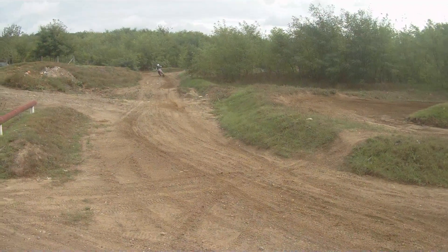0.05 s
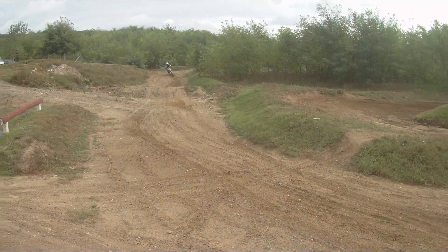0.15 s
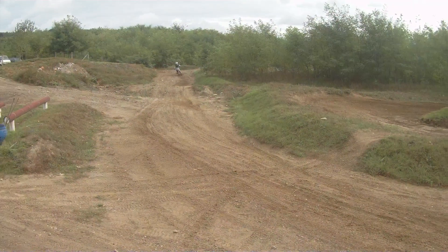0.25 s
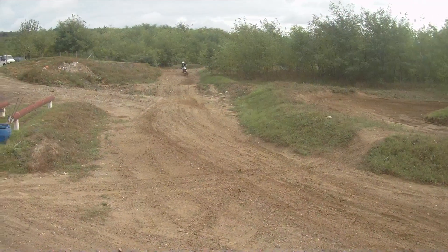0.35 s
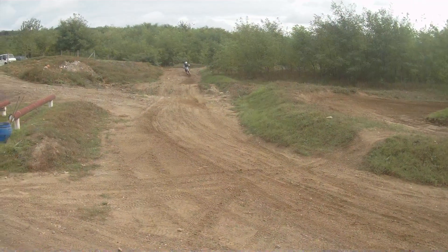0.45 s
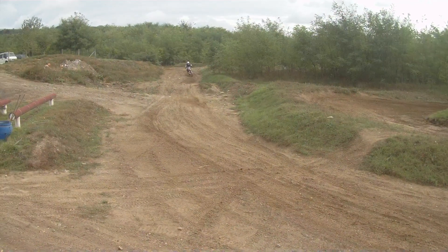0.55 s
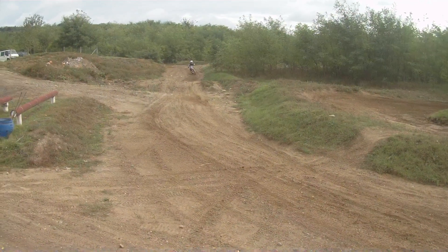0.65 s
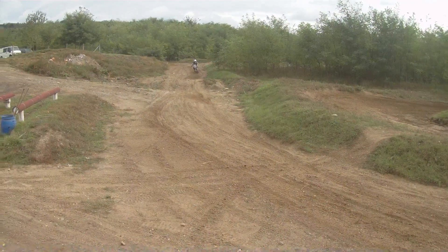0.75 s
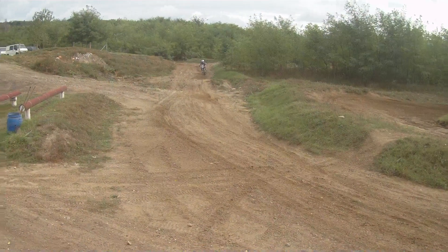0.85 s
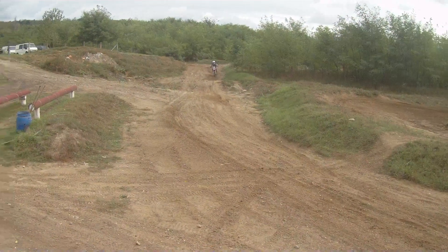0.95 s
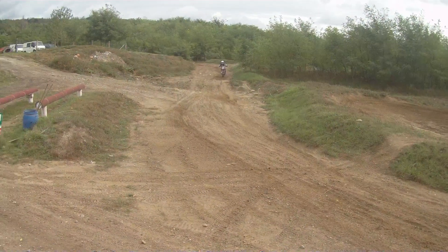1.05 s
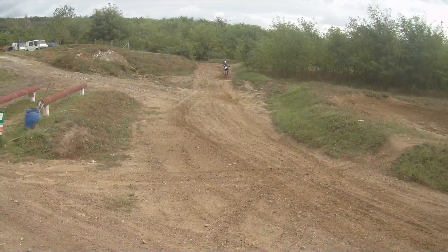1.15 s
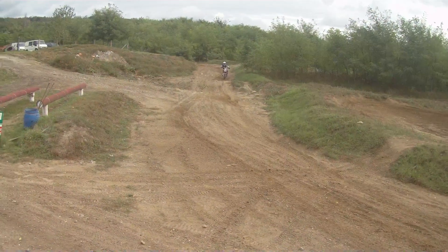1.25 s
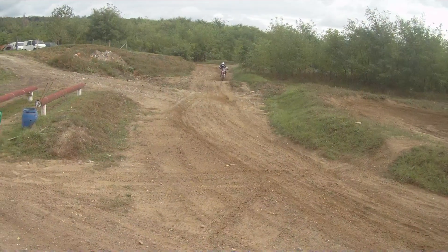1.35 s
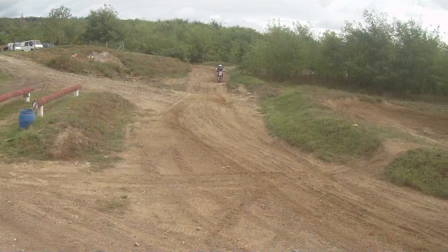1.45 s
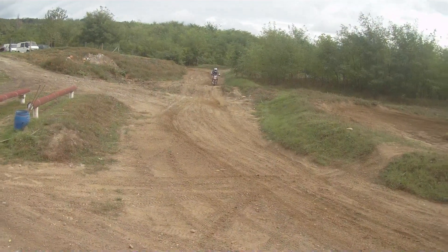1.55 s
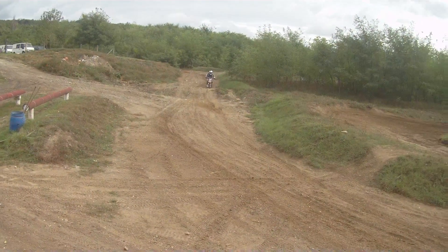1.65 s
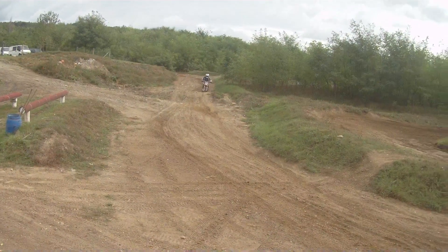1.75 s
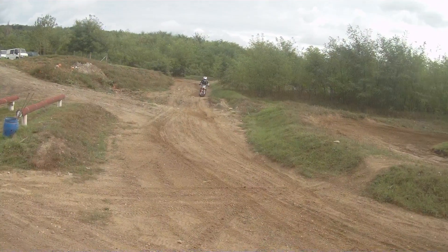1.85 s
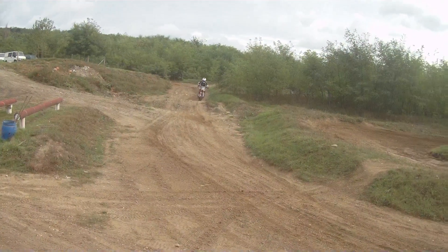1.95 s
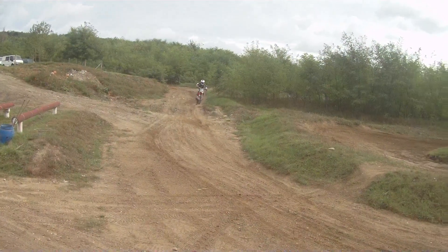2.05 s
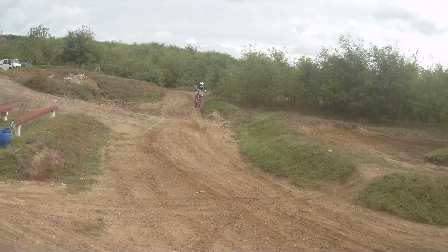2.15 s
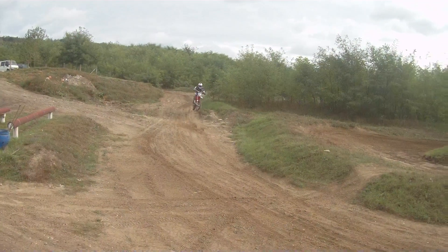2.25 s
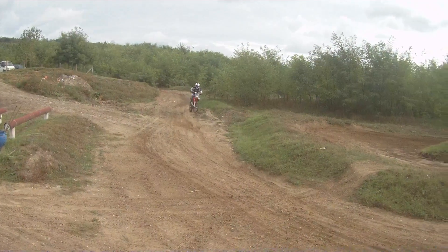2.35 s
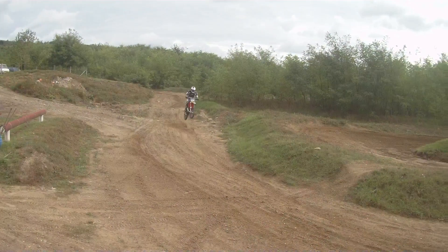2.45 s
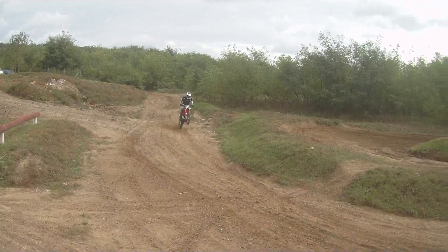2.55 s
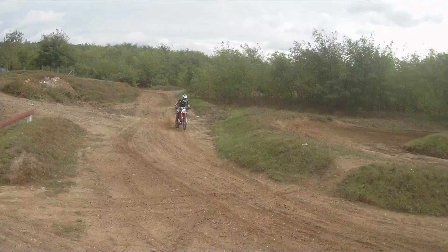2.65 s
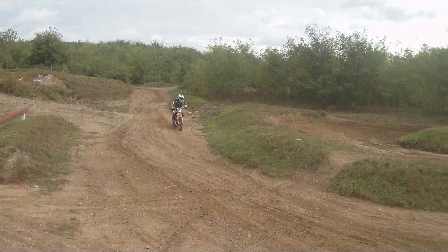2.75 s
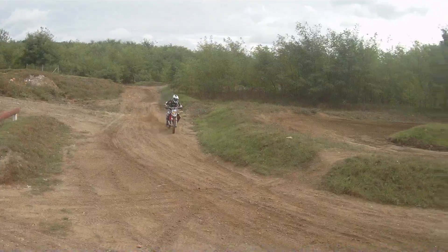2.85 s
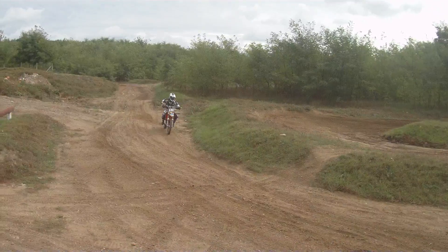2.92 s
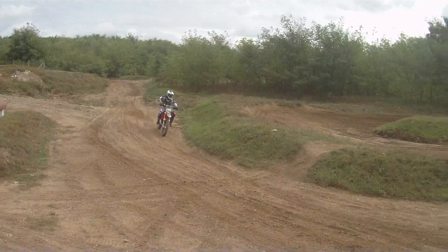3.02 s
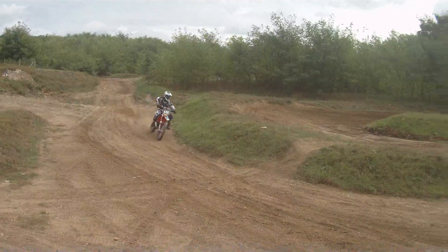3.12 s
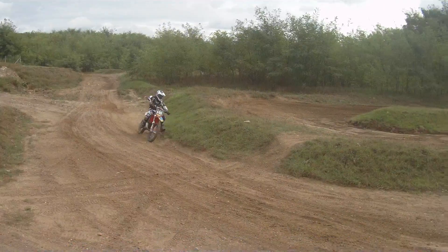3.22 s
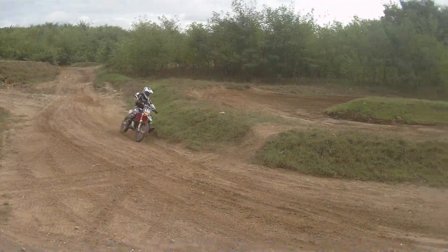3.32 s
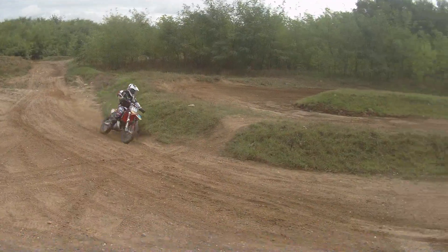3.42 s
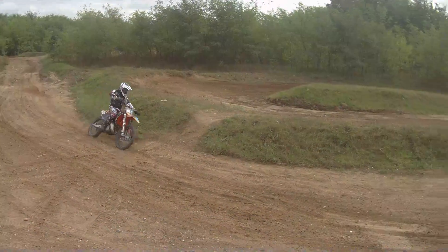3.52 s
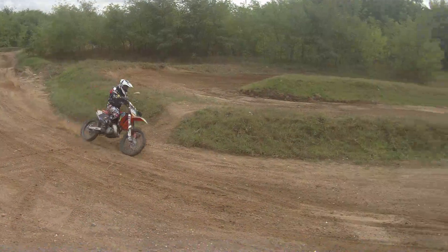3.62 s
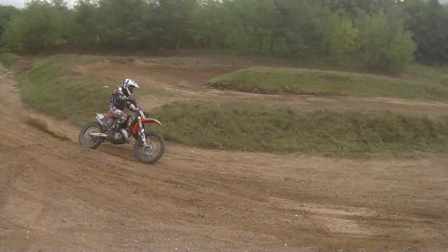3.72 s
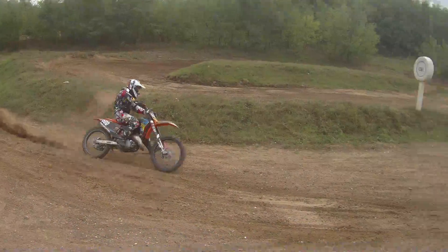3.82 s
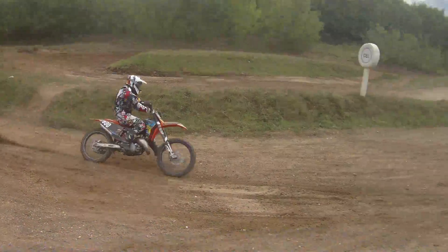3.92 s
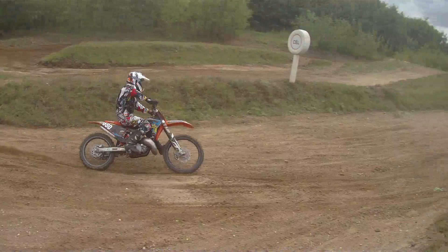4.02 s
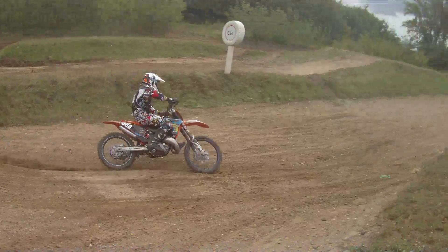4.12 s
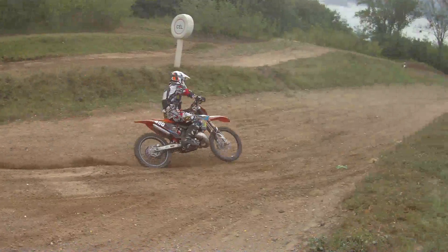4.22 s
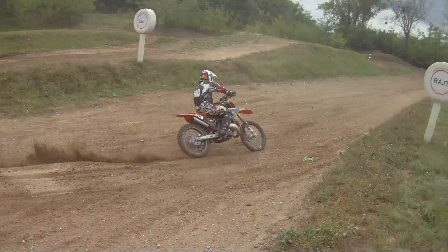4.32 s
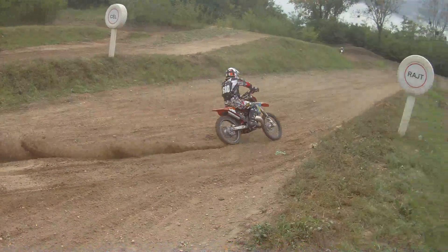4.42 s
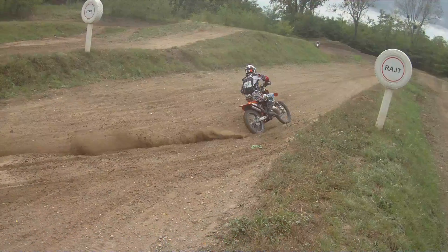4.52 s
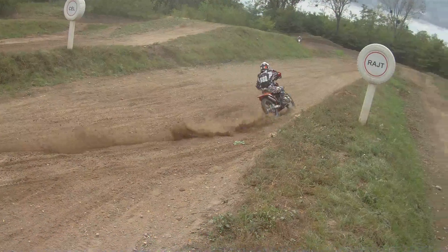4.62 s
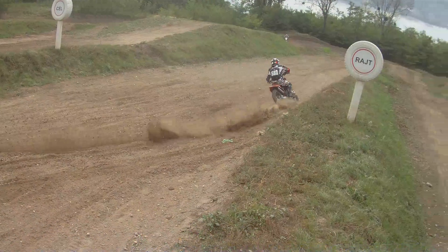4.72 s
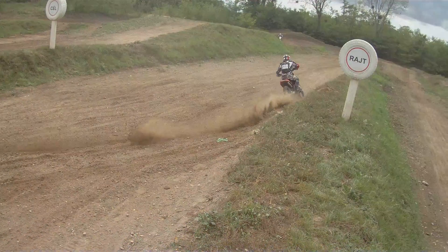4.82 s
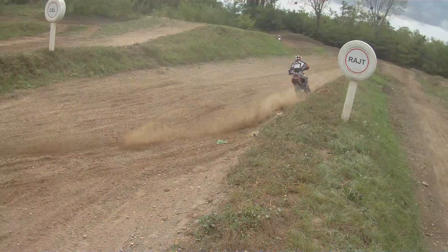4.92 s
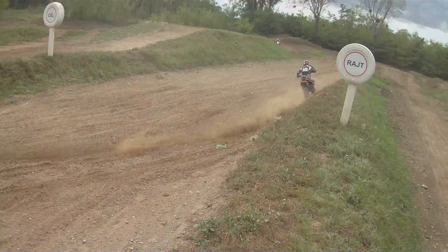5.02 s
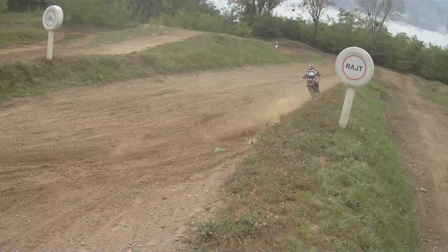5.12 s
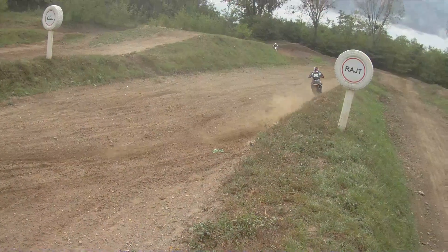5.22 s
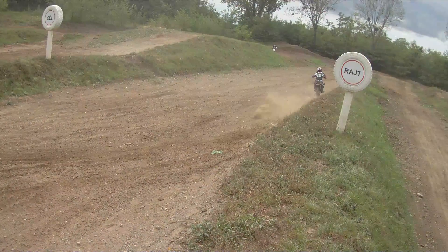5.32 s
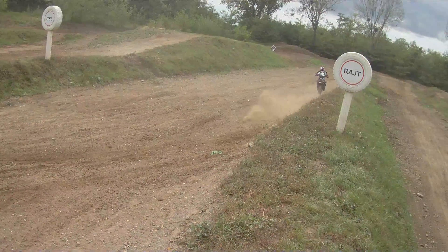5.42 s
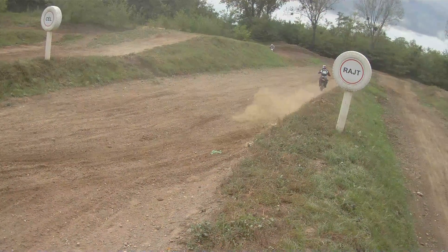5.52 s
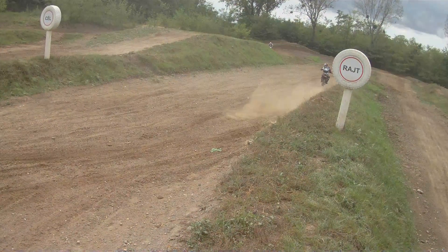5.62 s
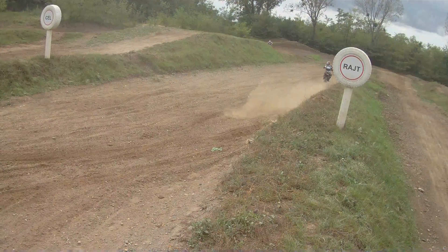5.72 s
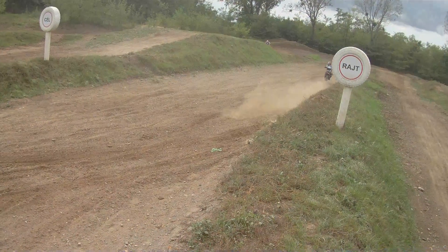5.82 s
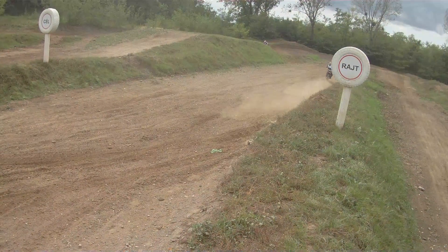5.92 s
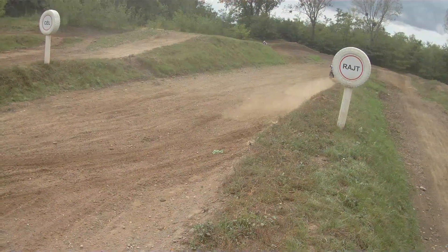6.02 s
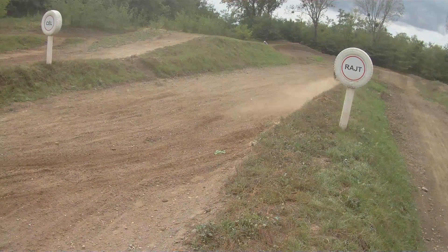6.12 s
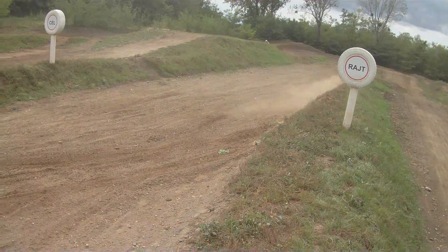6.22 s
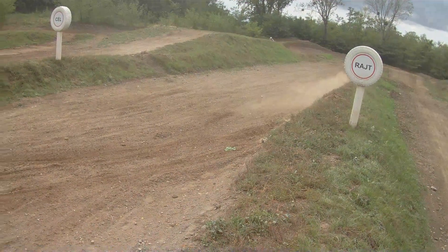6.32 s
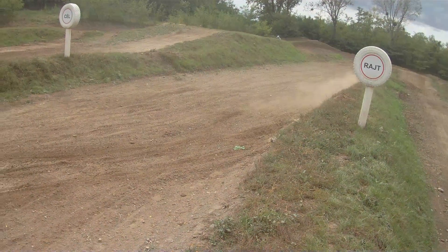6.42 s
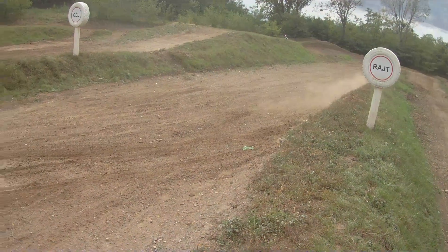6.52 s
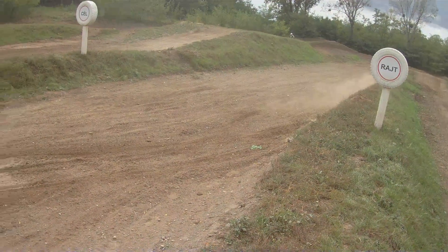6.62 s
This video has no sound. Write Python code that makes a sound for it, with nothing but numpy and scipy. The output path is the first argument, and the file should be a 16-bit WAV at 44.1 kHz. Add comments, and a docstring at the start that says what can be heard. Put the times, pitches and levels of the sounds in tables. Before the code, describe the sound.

Soft wind puffs and a dull far engine drone come first, with a two-stroke dirt bike stuttering and blipping in the distance. After a short coasting gap it opens up, sweeps by within a few metres, loud and raspy with wheelspin flares, then recedes in one long pull. The cheap microphone clips and adds glassy fizz; open air, slight scatter from banks and trees.

```python
"""A far four-stroke drones under light wind on the microphone, then a two-stroke motocross bike blips closer.
It rounds the bend under 9 m away at full throttle and climbs off, while another two-stroke whines far off.
Each engine is a train of firing pulses through pipe colours; the near one adds port cracks and gas noise.
Wind and the din of the track are coloured noise. The small camera overloads on the close pass and stores
12000 held samples a second, which adds a glassy fizz."""
import sys
import numpy as np
from scipy import signal
from scipy.fft import rfft, irfft, next_fast_len
from scipy.io import wavfile
from scipy.ndimage import map_coordinates

SR = 44100
rng = np.random.default_rng(int(sys.argv[2]) if len(sys.argv) > 2 else 0)


def master(y):
    """Save y as 16-bit WAV."""
    cut = np.clip(np.atleast_2d(y).T, -1, 1)
    pcm = np.round(cut * 32767)  # scale
    wavfile.write(sys.argv[1], SR, pcm.astype(np.int16))


N = 293706
TIME = np.arange(N) / SR  # s

# Where the near bike points. Each row: time in seconds, heading
# (0 = far off and head-on, 1 = close and side-on, 2 = tailpipe toward the camera).
HEADING = [(2.8, 0.036), (3.65, 0.97), (4.6, 1.106), (5.1, 1.48), (5.5, 1.63)]
# How far it is from the microphone. Each row: time in seconds, distance in metres.
DISTANCE = [(0, 74), (2, 31.2), (3, 29.7), (3.5, 17.5), (3.75, 8.7), (4.2, 8.8), (4.6, 8.34), (5.1, 12.5),
            (5.5, 18.1), (6.25, 30.4), (6.66, 60)]
NEAR_M, CRUISE_HZ = 6.82, 155.3  # voice levels hold at this distance and firing rate

# The rider's hand, one row per twist of the throttle. Each row: opening in seconds, shutting in seconds,
# firings a second pulled toward at first, the same at last, attack in seconds (the same small number is
# the relative thump in dB), relative pipe bark in dB, relative rasp in dB, a column left unused,
# swell from start to end in dB (each voice takes its own share of it).
THROTTLE = [(0.164, .23, 94, 106, 0.026, -9, -5, -8, -13),
            (0.332, .62, 109, 111.5, 0.024, -5.5, -4.5, -6.5, 1),
            (.68, 0.778, 104, 173, 0.0092, -4, 0.5, -3, -6),
            (.851, 1.53, 104, 139, 0.043, -1, -3.5, -5.5, -2),
            (1.943, 2.102, 180, 114, 0.019, -2, -3, -3, 1),
            (2.536, 2.721, 110, 188, 0.00094, 0, 1.5, -1.5, 0.5),
            (2.828, 3.025, 95, 114, 0.013, 0, 1, -1.5, -4),
            (3.515, 3.983, 149.4, 168.2, 0.0022, -2.5, -2.5, -6, 2.5),
            (3.986, 4.043, 139, 157, 0.0054, -4, -16, -14, 1.5),
            (4.047, 4.256, 132, 123, 0.0034, 1, 3, -2.5, -1.5),
            (4.249, 4.633, 137.6, 162.3, 0.017, 6, 6, 2.5, -2),
            (4.745, 4.795, 111, 111, 0.055, -1, -14, -18, 0.5),
            (4.8, 5.18, 119.2, 142, 0.0021, -1, 5, 0, 1), (5.179, 5.301, 136, 148.6, .012, -3, 3.5, -5, -1),
            (5.3, 6.411, 127.6, 168, .012, -1, -2.5, -3.5, 2),
            (6.41, 6.58, 151, 138, 0.013, -3, -3.5, -4, -0.5),
            (6.586, 6.648, 140, 150, .001, -3, 1, -2, -3)]
# The rear wheel loses grip and the revs flare. Each row: centre in seconds, extra firings a second,
# half length in seconds.
WHEELSPINS = [(0.489, 7, .06), (0.927, 10, 0.037), (1.272, 17.8, .034), (1.488, 9.9, 0.051),
              (3.651, 38, .068), (3.962, 9.7, .038), (4.284, 38.5, 0.086), (4.513, 10.15, .035),
              (4.953, 11.4, 0.035), (5.112, 32.7, 0.067), (5.459, 15, .05), (5.588, 23.6, 0.028),
              (5.821, 11.2, .2), (6.286, 7.7, 0.035), (6.424, 20.3, 0.035)]
IDLE_HZ = 100  # firings a second pulled toward with the throttle shut
FLYWHEEL_S = 0.035  # lag of the revs behind the throttle
RELEASE_S = 0.011  # the exhaust dies down when the throttle shuts
# Ripples in the climb rock the revs.
RIPPLES_FROM_S, RIPPLES_GROW_S, RIPPLE_CREST_S = 5.3, 0.3, 5.877
RIPPLES_PER_S, RIPPLE_SWING_HZ = 9.35, 2.6

# Low and middle exhaust colours as the bike turns. Each row: frequency in Hz, relative level head-on in dB,
# side-on in dB, from the rear in dB.
THUMP_COLOUR = [(61, -75.5, -52, -47), (99, -21, -20, -29), (131.2, 0.5, 3, -1), (160, -7.5, 1.5, -8.5),
                (224, 7, 5, -14), (266, 4, 9, 7.5), (305.4, -5, 1, 0), (348, -13, -3, -2.5),
                (380.7, -44, -6, -2.5), (518, -68, -56, -44), (1520, -96, -91, -103)]
BARK_COLOUR = [(314, -49.5, -50.5, -43.5), (357, -12.5, -13, 1.5), (436.2, 1, -1.5, -3.5),
               (458, 2, -2.5, 4), (582, -5, -5, 1), (623, 0.5, 2.5, 4), (684, 6, 4.5, 5),
               (758, -9, -1, -24), (830.8, -13.5, -14, -20.5), (907.5, -16.5, -11, -17.5),
               (1006.7, -23, -33, -68), (1350, -64, -49.5, -58.5), (3000, -97, -86.5, -91)]
# Rasp colours from the three sides. Each row: frequency in Hz, relative level in dB.
RASP_FRONT = [(650, -42), (1100, -16.5), (1330, -9.5), (1960, -4.5), (2250, 0), (2820, -16.5), (3130, -23),
              (3390, -13), (3660, -9), (4300, -35.5), (4780, -20.5), (5420, -26.5), (5900, -39),
              (7670, -79), (13000, -120)]
RASP_SIDE = [(650, -16), (1100, -11), (1570, 1.5), (2300, 9), (2490, 2.5), (2780, -1), (3180, -9.5),
             (3410, 1), (3630, 2), (3920, -5), (4300, -18.5), (4740, -9.5), (5240, -8.5), (5420, -11),
             (5900, -23), (7670, -51), (13000, -120)]
RASP_REAR = [(650, -7), (1100, -40), (1250, -6), (1380, -15), (1570, -2.5), (1700, -11), (2240, 6.5),
             (2670, -8.5), (3130, -20), (3410, -10.5), (3630, -5.5), (4360, -28.5), (4780, -19),
             (5350, -14), (5900, -50.5), (7670, -133), (13000, -120)]
# Cracks within one turn of the crank, as the ports open and close. Each row: share of a turn,
# relative level in dB.
PORTS = [(0, 3), (0.131, -5.5), (0.308, 1), (.52, -2)]
# How each exhaust voice carries. Each holds: level head-on in dB, side-on in dB, from the rear in dB,
# floor with the throttle shut in dB, dB per octave of revs, share of the swell.
THUMP_LAW = (-12, -12.5, -2.5, -16.5, 3, 0.5)
BARK_LAW = (-16, -11.5, 3.5, -20, 6.5, 1.5)
RASP_LAW = (-21, -15.5, -18.5, -9, 15.5, 1.5)

# Uneven burning (0-1): under load, weight of a shut throttle, seconds it takes to clear, extra at idling speed.
UNEVEN_LOADED, UNEVEN_SHUT, CLEARS_S, UNEVEN_IDLING = 0.07, 0.7, 0.055, 0.16
# Power share of gas noise in the rasp: close by, per doubling of distance, per unit of uneven burning.
GAS_NEAR, GAS_PER_DOUBLING, GAS_PER_UNEVEN = 0.049, 0.13, 0.75
SCATTER_NEAR_DB, SCATTER_DB_PER_DOUBLING = -23, 4.5  # sound scattered by banks and trees

# Far engines, before their waver. Each row: time in seconds, firings a second, level in dB.
FOUR_STROKE_RUN = [(0, 42.4, -45), (.3, 48, -37.5), (.7, 30.4, -38), (1.15, 50.5, -37), (1.5, 47.6, -36.5),
                   (2.1, 47, -39.5), (2.9, 50.6, -35.5), (3.45, 55, -37.5), (5.1, 57.3, -36.5),
                   (6.66, 59.5, -36.5)]
TWO_STROKE_RUN = [(0, 133, -69), (.25, 154, -40), (.5, 161, -45), (.7, 136, -42), (.9, 227, -47),
                  (1.8, 192, -50.5), (2, 280, -50), (2.2, 226, -44), (2.8, 238, -37), (3.45, 196, -56),
                  (5, 238, -49), (6.66, 170, -71)]
# Their pipes as heard across the track. Each row: frequency in Hz, relative level in dB.
FOUR_STROKE_PIPE = [(30, -37), (50, -2.5), (75, -11), (100, 0.5), (150, -12), (195, 2), (250, -1),
                    (305, -6), (370, -25.5), (480, -19), (650, -20.5), (1000, -40), (2000, -63)]
TWO_STROKE_PIPE = [(100, -30), (155, 16.5), (200, -7), (270, 1), (340, -17), (420, -15), (620, 5.5),
                   (720, -8), (850, -5.5), (1050, -25.5), (2200, -17), (4000, -37.5), (6000, -56)]

# Puffs of wind on the microphone, before their waver. Each row: time in seconds, peak level in dB.
GUSTS = [(0, -45), (.35, -39), (.85, -38), (1.3, -40), (1.62, -48), (1.83, -30.5), (2.65, -39), (2.86, -31),
         (3.28, -43), (4.34, -45), (4.69, -44)]
GUST_DB_PER_S, BREEZE_DB = 109, -64  # rise and fall of a puff; floor between puffs, before its waver
# Colour of the wind at the microphone. Each row: frequency in Hz, relative level in dB.
BUFFET_COLOUR = [(8, -3), (22, 9), (45, -2), (80, 0.5), (160, -21), (400, -57), (2000, -87)]
# Colour of the far track din. Each row: frequency in Hz, relative level in dB.
DIN_COLOUR = [(35, -43), (60, 8.5), (107, 1), (145, -4), (183, -5), (248, -8.5), (358, -2), (687, -16.5),
              (1070, -30), (1220, -25), (2260, -11.5), (2840, -29), (3650, -20.5), (4180, -33.5),
              (5900, -41), (7670, -74), (13000, -120)]

# Hollows of the microphone port. Each row: centre in Hz, width in Hz, depth from 0 to 1.
PORT_HOLLOWS = [(1077, 125, 0.65), (2728, 150, 0.68), (4310, 170, 0.33)]
STORE_HZ, TOP_HZ = 12000, 15400  # samples stored a second; top of the output band
LEFT_OFFSET = 0.027  # constant offset on the left channel before overload, 1 = full scale


def near_bike():
    """Each firing thumps, rings the expansion pipe and lets out cracks with a jet of gas."""
    rate = revs()
    thump_twists, bark_twists, rasp_twists = np.transpose(THROTTLE)[4:7]
    thump_db = loudness(THUMP_LAW, thump_twists, rate)
    bark_db = loudness(BARK_LAW, bark_twists, rate)
    rasp_db = loudness(RASP_LAW, rasp_twists, rate)
    uneven, gas, scatter_db = burning(rate)

    # nearly exact firings under load; they stumble as burning grows uneven
    at = firings(rate * (1 + 0.001 * wobble(40)), scatter=0.0007 + 0.016 * uneven)
    blows = pulses(at, spread_db=0.57 + 1.3 * uneven)
    thump = amp(thump_db) * aimed(blows, outlines_by_heading(THUMP_COLOUR))
    bark_outlines = outlines_by_heading(BARK_COLOUR)
    bark = amp(bark_db) * aimed(bounced(blows, share=0.44, lag=0.002898, sway=0.25), bark_outlines)

    # the cracks vary more from firing to firing than the low thump does
    cracks = port_cracks(at, spread_db=1.0 + 1.6 * uneven, flutter=0.0021, drift=0.041)
    jet_decay = np.exp(-TIME[:SR // 50] * 480)
    jet_strength = steady(signal.fftconvolve(cracks, jet_decay)[:N])
    jet = (jet_strength + 1.8) * rng.standard_normal(N)
    edge = np.sqrt(1 - gas) * steady(cracks) + np.sqrt(gas) * steady(jet)
    rasp = amp(rasp_db) * aimed(edge, [RASP_FRONT, RASP_SIDE, RASP_REAR])
    gas_rush = amp(bark_db) * uneven * aimed(jet, bark_outlines)

    direct = thump + bark + gas_rush + rasp
    return direct + scattered(direct * amp(scatter_db), t60=0.28)


def revs():
    """Firings a second: the flywheel follows the throttle, wheelspin flares it and ripples rock it."""
    first, last = np.transpose(THROTTLE)[2:4]
    pull = lagged(throttled(first, last, IDLE_HZ), FLYWHEEL_S)
    flares = sum(extra * np.exp(-((TIME - s) / half) ** 2) for s, extra, half in WHEELSPINS)
    rippled = np.clip((TIME - RIPPLES_FROM_S) / RIPPLES_GROW_S, 0, 1)
    rocking = np.cos(2 * np.pi * RIPPLES_PER_S * (TIME - RIPPLE_CREST_S))
    return pull + flares + RIPPLE_SWING_HZ * rippled * rocking


def throttled(first, last, shut):
    """A control that runs from first to last during each twist of the throttle and rests at shut between."""
    control = np.full(N, float(shut))
    for (opens, shuts, *_), a, b in zip(THROTTLE, first, last):
        held = (TIME >= opens) & (TIME < shuts)
        control[held] = np.interp(TIME[held], [opens, shuts], [a, b])
    return control


def loudness(law, twist_db, rate):
    """Level of one exhaust voice in dB: twists attack, swell and release; revs, heading and distance add."""
    front_db, side_db, rear_db, shut_db, db_per_octave, swell_share = law
    effort = np.zeros(N)
    for (opens, shuts, _, _, attack_s, *_, swell_db), db in zip(THROTTLE, twist_db):
        on = (TIME > opens) & (TIME < shuts + 10 * RELEASE_S)
        t = TIME[on]
        attack = 1 - np.exp((opens - t) / attack_s)
        release = np.exp(np.minimum(shuts - t, 0) / RELEASE_S)
        swell = swell_share * swell_db * np.interp(t, [opens, shuts], [-0.5, 0.5])
        effort[on] += attack * release * amp(db + swell)
    effort_db = 20 * np.log10(np.maximum(effort, amp(shut_db)))
    revs_db = db_per_octave * np.log2(rate / CRUISE_HZ)
    aim_db = np.interp(curves(HEADING)[0], [0, 1, 2], [front_db, side_db, rear_db])
    return effort_db + revs_db + aim_db - 20 * np.log10(curves(DISTANCE)[0] / NEAR_M)


def burning(rate):
    """Low revs and a shut throttle make burning uneven; distance blurs the rasp and adds scattered sound."""
    loaded = np.zeros(len(THROTTLE))
    fouled = lagged(throttled(loaded, loaded, 0.98), CLEARS_S)
    lugging = np.interp(rate, [IDLE_HZ, CRUISE_HZ], [1, 0])
    uneven = np.clip(UNEVEN_LOADED + UNEVEN_SHUT * fouled + UNEVEN_IDLING * lugging, 0, 1)
    doublings = np.log2(curves(DISTANCE)[0] / NEAR_M)
    gas = np.clip(GAS_NEAR + GAS_PER_DOUBLING * doublings + GAS_PER_UNEVEN * uneven, 0, 1)
    return uneven, gas, SCATTER_NEAR_DB + SCATTER_DB_PER_DOUBLING * doublings


def firings(rate, scatter):
    """Sample positions of the firings; scatter is their timing spread in cycles."""
    turns = np.cumsum(rate) / SR
    at = np.interp(np.arange(1, int(turns[-1])), turns, np.arange(N))
    slip = rng.standard_normal(N)[:len(at)] * (scatter * SR / rate)[at.astype(int)]
    return np.clip(at + slip, 0, N - 2)


def pulses(at, spread_db):
    """One pressure pulse a firing, each of its own strength, shared between the two nearest samples."""
    i, part = at.astype(int), at % 1
    strength = amp(rng.standard_normal(N)[:len(at)] * np.broadcast_to(spread_db, N)[i])
    return np.bincount(i, strength * (1 - part), N) + np.bincount(i + 1, strength * part, N)


def port_cracks(at, spread_db, flutter, drift):
    """Cracks tied to the crank; hot gas makes each a little early or late, so the snarl keeps changing."""
    turn = np.arange(len(at))
    cracks = np.zeros(N)
    for share, db in PORTS:
        slip = flutter * rng.standard_normal(N)[:len(at)] + drift * wobble(16)[at.astype(int)]
        # later cracks in the turn stray further
        crack_turn = turn + share + np.sqrt(abs(share)) * slip
        cracks += amp(db) * pulses(np.interp(crack_turn, turn, at), spread_db)
    return cracks


def bounced(x, share, lag, sway):
    """The ground returns a copy lag seconds late; bumps sway the lag, so harmonics swell and fade."""
    delay = lag * (1 + sway * wobble(5)) * SR
    return x + share * np.interp(np.arange(N) - delay, np.arange(N), x)


def aimed(x, outlines):
    """The exhaust's colour changes as the bike comes on, passes and leaves; rms held near 1."""
    heading = np.clip(curves(HEADING)[0], 0, 2)
    mix = np.zeros(N)
    for k, outline in enumerate(outlines):
        facing = np.maximum(1 - abs(heading - k), 0)
        mix += facing * steady(coloured(x, outline))
    return steady(mix)


def outlines_by_heading(table):
    """One (Hz, dB) outline for each heading."""
    hz, *levels = np.transpose(table)
    return [np.column_stack([hz, db]) for db in levels]


def scattered(x, t60):
    """Diffuse answer of banks and trees: a noise tail that falls 60 dB in t60 seconds."""
    t = TIME[:SR // 2]
    tail = rng.standard_normal(len(t)) * amp(-60 * t / t60) * (1 - np.exp(-t / 0.012))
    return signal.fftconvolve(x, tail / np.linalg.norm(tail))[:N]


def far_bike(run, pipe, scatter, spread_db):
    """A distant engine: dull firings whose level wavers in the air."""
    rate, db = curves(run)
    blows = pulses(firings(rate * (1 + 0.0038 * wobble(12)), scatter), spread_db)
    return amp(db + 0.94 * wobble(9.9)) * steady(coloured(blows, pipe))


def wind_on_microphone():
    """Low buffeting noise on the microphone, in puffs that rise and fall over a faint breeze."""
    puffs_db = np.max([db - GUST_DB_PER_S * abs(TIME - s) for s, db in GUSTS], axis=0)
    wind_db = np.maximum(BREEZE_DB, puffs_db) + 3.6 * wobble(8.46)
    wind = coloured(rng.standard_normal(N), BUFFET_COLOUR)
    return amp(wind_db) * wind / wind.std()


def track_din():
    """The blurred din of the far track: coloured noise with a wavering level."""
    din = coloured(rng.standard_normal(N), DIN_COLOUR)
    return amp(-46.5 + 3.6 * wobble(4.95)) * din / din.std()


def amp(db):
    """Decibels to gain."""
    return 10 ** (np.asarray(db) / 20)


def steady(x):
    """x held near rms 1 under a sliding 50 ms window."""
    window = signal.get_window("hann", SR // 20)
    power = np.abs(signal.fftconvolve(x * x, window / window.sum(), "same"))
    return x / np.sqrt(power + 1e-14)


def curves(rows):
    """One value per sample for each column after the time."""
    s, *cols = np.transpose(rows)
    return [np.interp(TIME, s, c) for c in cols]


def wobble(rate):
    """A smooth random curve, rate knots a second."""
    return map_coordinates(rng.standard_normal(int(N * rate / SR) + 4), [TIME * rate])


def lagged(x, seconds):
    """x followed with a first-order lag."""
    keep = np.exp(-1 / (max(seconds, 1 / SR) * SR))
    return x[0] + signal.lfilter([1 - keep], [1, -keep], x - x[0])


def coloured(x, points, size=8192):
    """x through a causal, minimum-phase filter with the given (Hz, dB) outline."""
    f, db = np.transpose(points)
    bins = np.fft.rfftfreq(size, 1 / SR)
    log_gain = np.log(amp(np.interp(np.log(bins + 1), np.log(f), db)) + 1e-6)
    # folding the cepstrum forward in time gives the minimum phase
    cepstrum = irfft(log_gain)
    cepstrum[1:size // 2] *= 2
    cepstrum[size // 2 + 1:] = 0
    return signal.fftconvolve(x, irfft(np.exp(rfft(cepstrum))))[:N]


def filtered(x, response):
    """x times a complex response of frequency."""
    m = next_fast_len(N + SR // 2)
    return irfft(rfft(x, m) * response(np.fft.rfftfreq(m, 1 / SR)), m)[..., :N]


def scene():
    """Near bike, far bikes, wind and din reach one microphone; both channels start alike."""
    drone = far_bike(FOUR_STROKE_RUN, FOUR_STROKE_PIPE, scatter=0.013, spread_db=3.5)
    whine = far_bike(TWO_STROKE_RUN, TWO_STROKE_PIPE, scatter=0.037, spread_db=2.0)
    return np.tile(near_bike() + drone + whine + wind_on_microphone() + track_din(), (2, 1))


def microphone_port(f):
    """Response of the port: each hollow is a notch of its own width and depth."""
    response = np.ones(len(f), complex)
    for centre, width, depth in PORT_HOLLOWS:
        band = 1j * f * width / (centre * centre - f * f + 1j * f * width)
        response *= 1 - np.clip(depth, 0, 1) * band
    return response


def record(dry):
    """Port hollows, a thin right channel, overload, then coarse held samples that mirror into the treble."""
    left, right = filtered(dry, microphone_port)
    thin_right = filtered(right, lambda f: 1j * f / (290 + 1j * f))  # low cut at 290 Hz
    pair = np.array([left + LEFT_OFFSET, thin_right])
    overloaded = pair / (1 + np.abs(pair) ** 16) ** (1 / 16)
    stored = signal.resample_poly(overloaded, STORE_HZ, SR, axis=1, window=("kaiser", 6))
    # each stored sample is held for 8 steps, which leaves mirror images above its band
    held = np.repeat(np.clip(stored, -1, 1), 8, axis=1)
    out = signal.resample_poly(held, SR, 8 * STORE_HZ, axis=1)[:, :N]
    return filtered(out, lambda f: f < TOP_HZ)


dry = scene()
out = record(dry)
master(out)
```